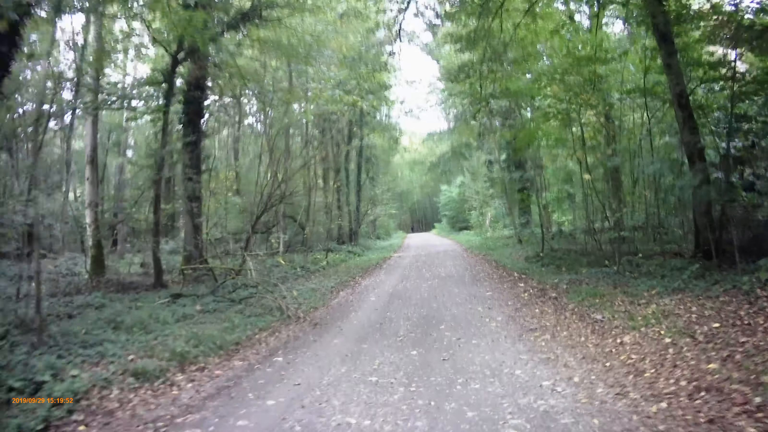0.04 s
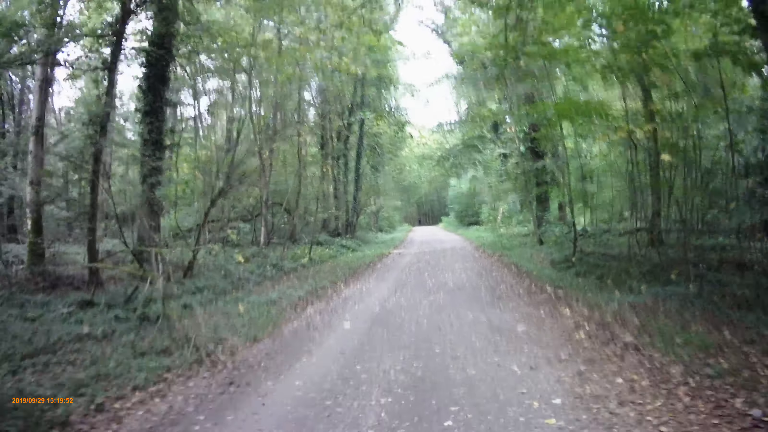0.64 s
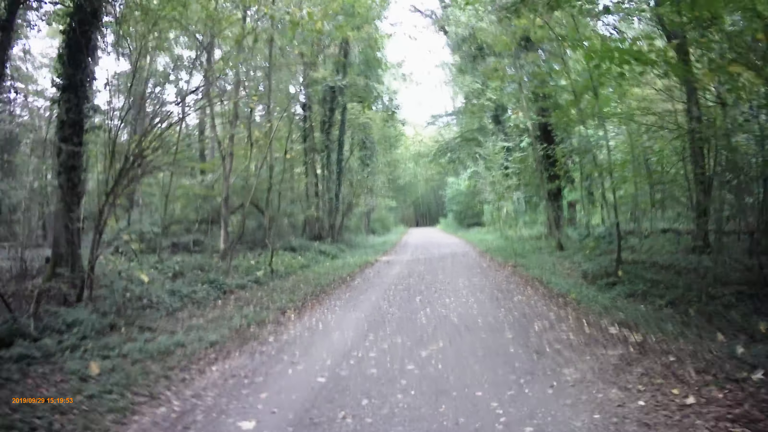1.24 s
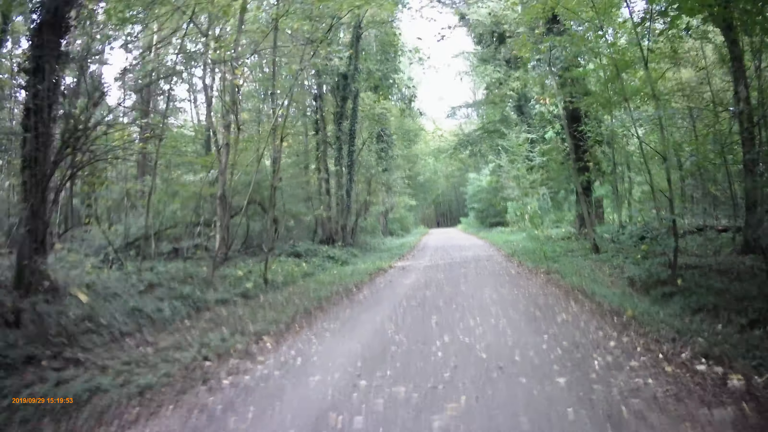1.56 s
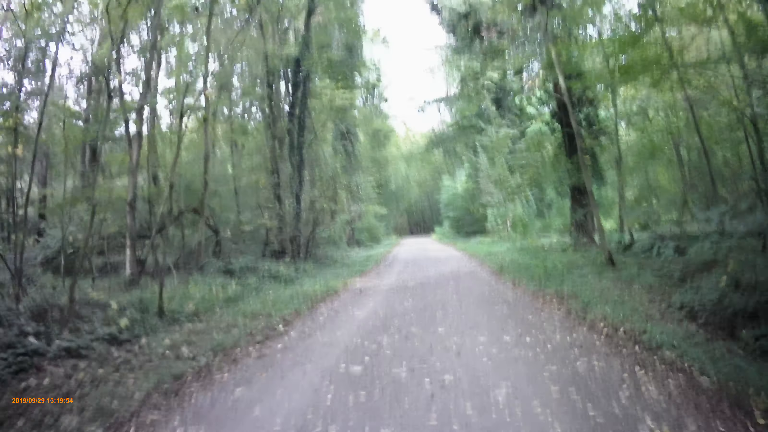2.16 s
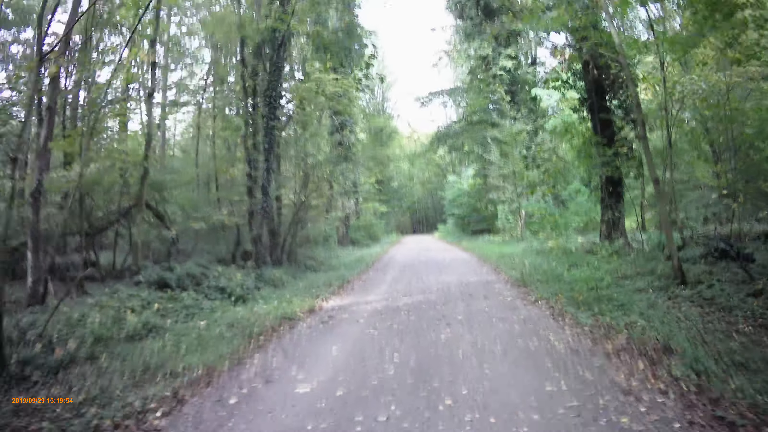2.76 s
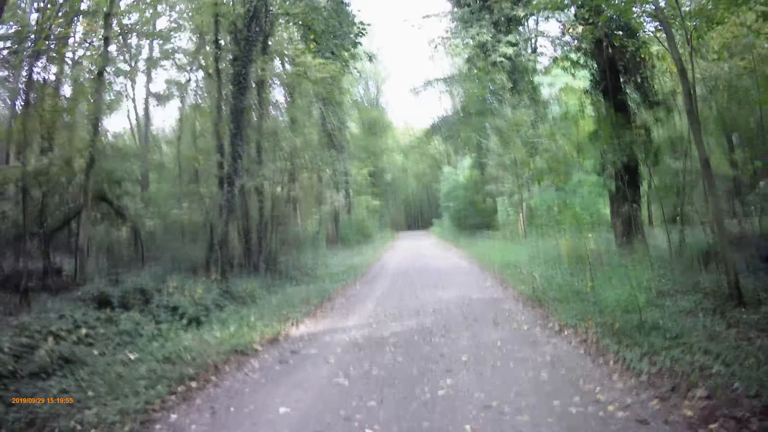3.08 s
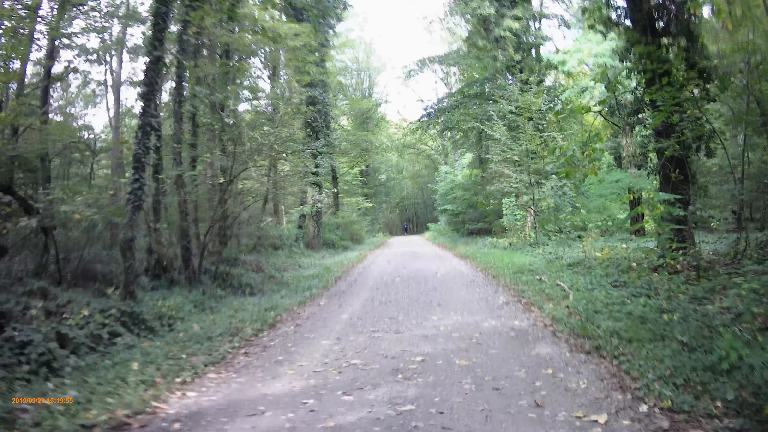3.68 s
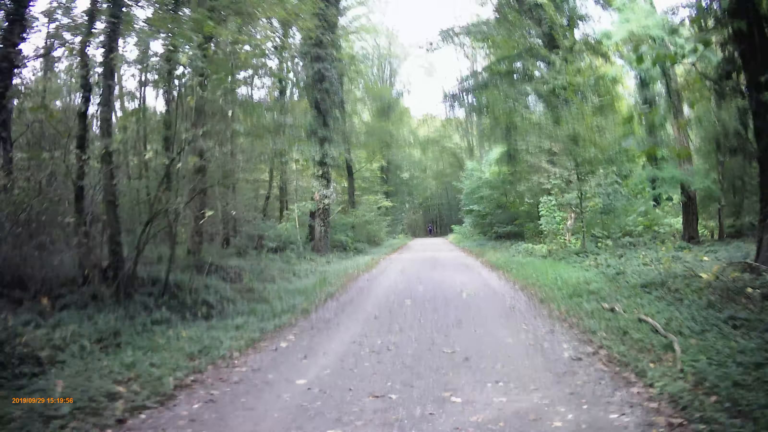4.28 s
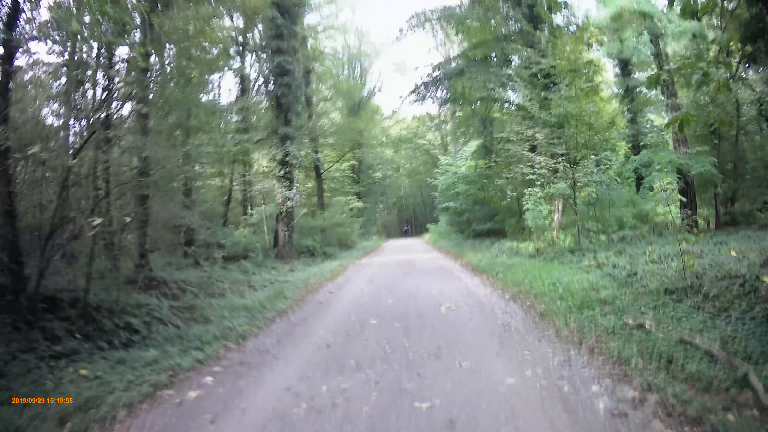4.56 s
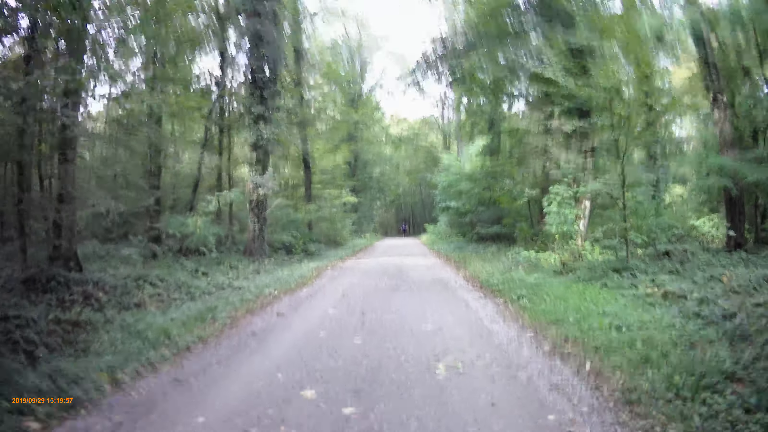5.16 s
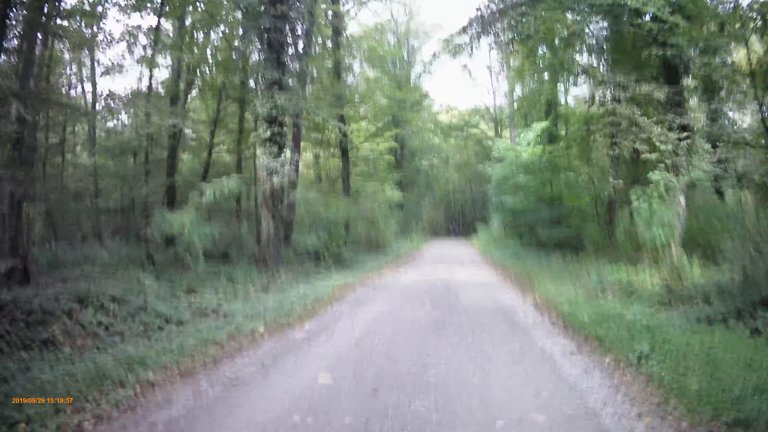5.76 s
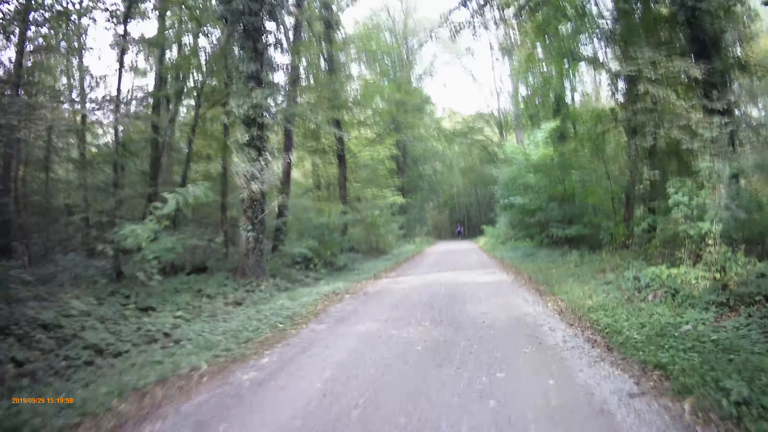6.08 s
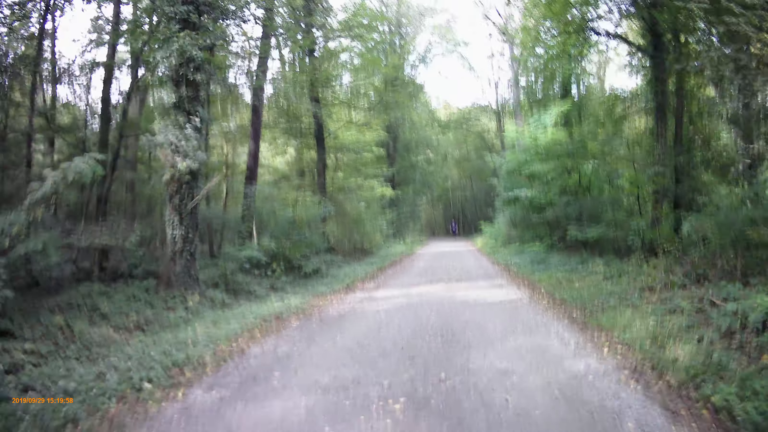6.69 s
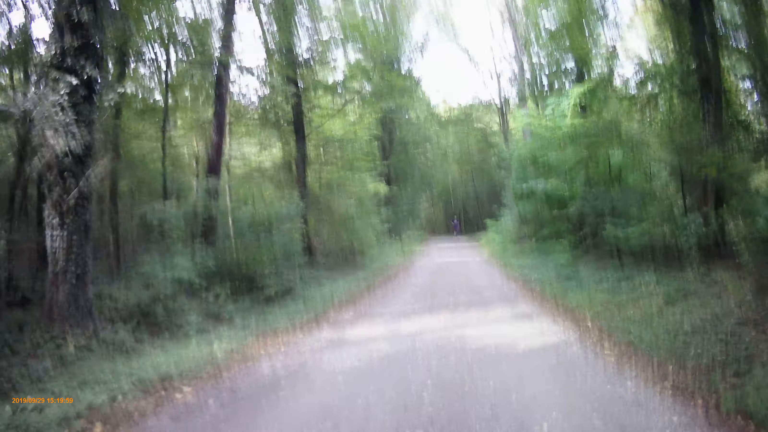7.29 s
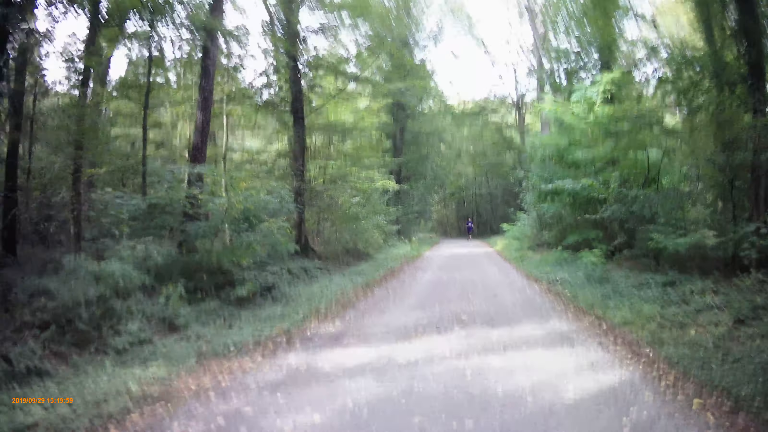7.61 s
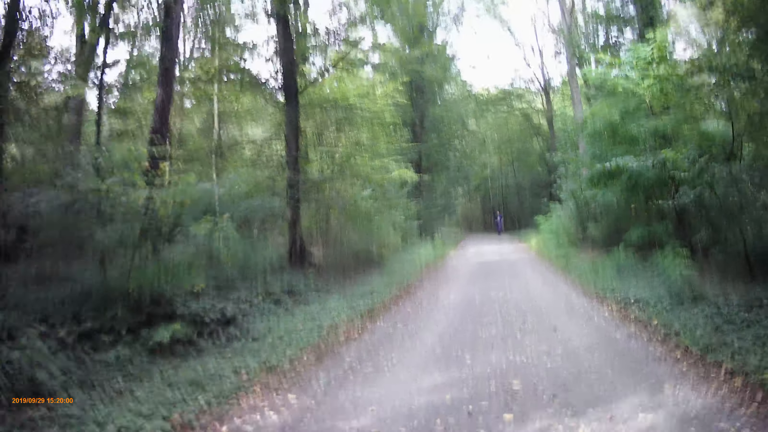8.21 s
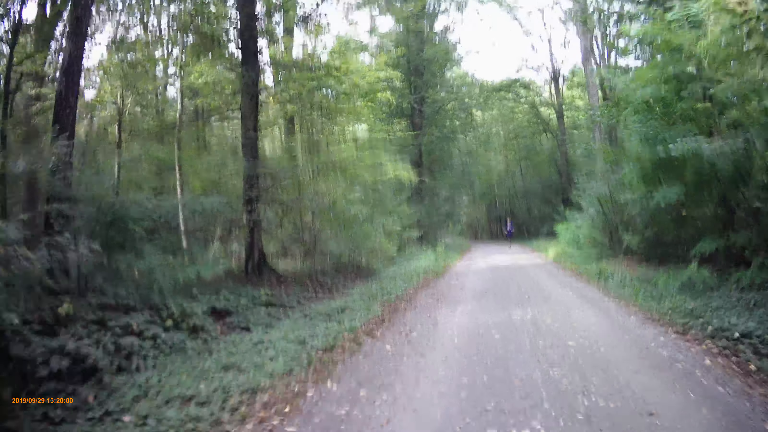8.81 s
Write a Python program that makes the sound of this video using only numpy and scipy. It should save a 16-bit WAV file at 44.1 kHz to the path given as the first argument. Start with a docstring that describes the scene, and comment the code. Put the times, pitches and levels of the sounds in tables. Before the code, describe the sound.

A bicycle rolls along a fine gravel path in woodland, heard close up from the handlebar with no echo. For all nine seconds the tyres rumble and crunch over grit, with a low hum from the swaying bar and a thin chatter of small loose parts. From about 0.9 seconds, bumps make a loose mount click and clatter at uneven intervals, and the hum and chatter swell with each strike. At 1.6 seconds a stone shoots out from under a tyre with a sharp, dry pop, the loudest sound. Fainter stone ticks and short hollow pebble knocks are scattered throughout. A cluster of rattles comes around 2 seconds, then hard knocks near 4.1 and 6.7 seconds. The rattling is busiest from about 7.3 to 7.8 seconds, and one more hard knock lands at 8.8 seconds as the tyres roll on.

```python
"""A bicycle rolls along a fine gravel path in woodland, heard from a camera on its handlebar.
From the start the tyres rumble and crunch over grit, while the swaying bar hums and small parts chatter.
Soon stones pop out from under the tyres and pebbles knock on the bicycle. From about 0.9 s, bumps throw
the loose camera mount against its stop, and the hum and chatter swell with each strike. The loudest
stone pops at 1.6 s; hard strikes come near 4.1, 6.7, 7.3 and 8.8 s, the first and last ringing on."""
import sys
import numpy as np
from scipy import signal
from scipy.fft import rfft, irfft, next_fast_len
from scipy.io import wavfile
from scipy.ndimage import uniform_filter1d, map_coordinates

SR = 44100
rng = np.random.default_rng(int(sys.argv[2]) if len(sys.argv) > 2 else 0)


def pcm_store(signal):
    """Save signal as 16-bit PCM."""
    levels = np.round(np.clip(np.atleast_2d(signal), -1, 1) * 32767)
    wavfile.write(sys.argv[1], SR, levels.astype(np.int16).T)


N = 399096

# tone of crunching gravel: frequency_hz, level_db
GRAVEL_TONE = [(150, -40.5), (500, -6.5), (1000, 2), (1400, -1), (1900, -3.2), (2400, -6.6), (2800, -13.5),
               (3300, -17.5), (4300, -24), (5000, -25), (5400, -30), (7200, -37.5), (11500, -41),
               (13000, -71)]
# tone of the mount's clicking catch: frequency_hz, level_db
CATCH_TONE = [(800, -27), (2400, -2.5), (3400, -13), (3870, -3), (4200, -7), (4620, 2), (4930, 1.5),
              (5220, -18), (6050, -16), (7200, -26.5), (8100, -21), (9300, -29), (10600, -21.5),
              (12500, -54)]
# notes the camera housing rings with: pitch_hz, level_db, fade_s (a fade is the time to drop 60 dB)
HOUSING_NOTES = [(167, -15.5, 0.068), (427, -6.5, 0.014), (675, -5, 0.03), (845, -9.5, .028),
                 (1026, -7.5, 0.036), (1230, -5, 0.016), (1608, -0.5, 0.01), (1920, -4, 0.0098),
                 (2400, -4.5, 0.0062), (3270, -14, 0.0071), (3888, -9, 0.0065)]
HARD_STRIKE_DB = -32.5  # beyond this force the bar sways hardly any wider


def amp(db):
    """Turn decibels into a number to multiply by."""
    return 10 ** (np.asarray(db) / 20)


def unit(x):
    """Scale a sound to an average strength (rms) of 1."""
    return x / np.sqrt(np.mean(x ** 2) + 1e-20)


def burst(x, size):
    """Scale a blow so that its loudest stretch of size samples has rms 1."""
    return x / np.sqrt(uniform_filter1d(x ** 2, size, mode="constant").max())


def limited(db, top_db):
    """Let a level grow until it nears top_db."""
    return db - 10 * np.log10(1 + amp(db - top_db) ** 2)


def gain(tone, hz):
    """How strong a tone table of (frequency_hz, level_db) is at hz."""
    frequency_hz, level_db = np.transpose(tone)
    return amp(np.interp(np.log(hz + 1), np.log(frequency_hz + 1), level_db))


def wobble(rate):
    """A smooth curve through rate random values a second."""
    values = rng.standard_normal(int(N * rate / SR) + 4)
    return map_coordinates(values, [np.arange(N) * rate / SR])


def filtered(x, response):
    """Multiply each frequency in x by response(hz)."""
    size = next_fast_len(N + SR // 2)
    return irfft(rfft(x, size) * response(np.fft.rfftfreq(size, 1 / SR)), size)[:N]


def ring(tone, size=2048):
    """The sound of one sharp tap on a body with this tone table."""
    cepstrum = irfft(np.log(gain(tone, np.fft.rfftfreq(size, 1 / SR))))
    cepstrum[1:size // 2] *= 2  # these two lines put all the ringing after the tap
    cepstrum[size // 2 + 1:] = 0
    return irfft(np.exp(rfft(cepstrum)))


def struck(notes, attack_s, pitch=1, size=4096):
    """A struck body rings with fading notes; neighbours start in opposite directions."""
    t = np.arange(size) / SR
    ringing = sum((-1) ** k * amp(db - 60 * t / fade_s) * np.sin(2 * np.pi * hz * pitch * t)
                  for k, (hz, db, fade_s) in enumerate(notes))
    return (1 - np.exp(-t / attack_s)) * ringing


def add(track, start_s, sound):
    """Mix a sound into the track at start_s."""
    part = track[max(round(start_s * SR), 0):][:len(sound)]
    part += sound[:len(part)]


def uneven(count, spread_db, upper=2):
    """Random strengths for count impacts, scattered around 1."""
    return amp(spread_db * np.clip(rng.standard_normal(count), -2, upper))


def grains(rate, spread_db):
    """Tiny random impacts, about rate of them a second."""
    sizes = uneven(N, spread_db) * rng.choice([-1, 1], N)
    return unit(sizes * (rng.random(N) < rate / SR))


def strikes(repeat_s=.042):
    """A bump makes the mount strike, at times again on every second swing: (start_s, click_db, force_db)."""
    # bumps in the path: start_s, force_db, extra_click_db, then force_db of any repeats
    bumps = [(.867, -40, -4.5, -34.5), (.956, -43, -5), (1.072, -35.5, 0, -33), (1.1735, -42, 0),
             (1.407, -36, -3, -42), (1.861, -39.5, -12, -36), (1.986, -28.5, -2.5), (2.008, -33, -19),
             (2.027, -49, 8), (2.046, -25.5, -16), (2.18, -36, -10, -32.5), (2.482, -33, -.5, -31.5),
             (2.573, -34, -20), (2.661, -34, -17), (2.684, -35, 1.5, -37.5, -39), (3.161, -31, -1.5, -36),
             (3.378, -35.5, -.5), (3.502, -47, 4), (3.788, -38.5, -2.5), (4.008, -32, -1.5),
             (4.04, -40, -5), (4.0545, -16.3, -3), (4.116, -37, -12), (4.141, -34.5, -1.5, -37),
             (4.165, -31.5, 1, -46), (4.219, -34.5, -3), (4.404, -36.5, -9), (4.553, -38.5, 1, -39),
             (4.68, -32.5, -1), (4.703, -31.5, .5, -35), (4.765, -36, 1, -43), (4.856, -46, 1),
             (4.908, -37.5, -.5), (4.964, -39, -7), (5.119, -50, 3), (5.275, -37, .5), (5.481, -36, -1.5),
             (5.563, -30.5, 0, -30.5), (5.882, -40, -4.5), (6.052, -33, -.5), (6.222, -39.5, -2.5),
             (6.349, -32.5, 0, -40.5), (6.409, -33, .5), (6.5526, -46, 3.5), (6.6207, -28, -2, -15),
             (6.651, -36, -9), (6.702, -46, -1), (6.77, -38, -9), (6.79, -38, -11), (6.843, -37, -10),
             (6.865, -40, -2.5, -44), (7.057, -26.5, 1), (7.159, -36, -2), (7.304, -26.5, 1.5),
             (7.327, -19, 0.5, -19.5), (7.346, -30, -9), (7.3875, -21, 1.5, -33), (7.411, -39, -3),
             (7.477, -39, -5), (7.574, -37, -10), (7.598, -26.5, 3), (7.619, -37, 1), (7.689, -36.5, -7),
             (7.731, -28.5, -2), (7.752, -27.5, 0, -31), (7.839, -32, -1), (8.151, -32, -6),
             (8.175, -32, 1.5), (8.239, -44.5, 0, -35), (8.259, -28, 2), (8.303, -33, -1.5, -32),
             (8.469, -35, -15), (8.49, -38.5, -7), (8.717, -37, -7), (8.751, -37, -14), (8.7785, -22, -8.5),
             (8.798, -37, -9)]
    return [(start_s + k * repeat_s, limited(force_db - .5, top_db=-30) + extra_click_db, force_db)
            for start_s, first_db, extra_click_db, *repeats in bumps
            for k, force_db in enumerate([first_db, *repeats])]


def sway(rise_s=.022, fall_s=.042, calm_db=-10.5):
    """How widely the bar sways, in dB around its average: it builds up to each strike, then dies away."""
    t = np.arange(-SR // 2, SR // 2) / SR
    swell = np.exp(np.minimum(t / rise_s, -t / fall_s))
    power = np.full(N, amp(calm_db) ** 2)
    for start_s, _, force_db in strikes():
        jolt = amp(limited(force_db, HARD_STRIKE_DB) - HARD_STRIKE_DB)
        add(power, start_s + t[0], (jolt * swell) ** 2)
    level_db = 10 * np.log10(power)
    return level_db - level_db.mean()


def tyre_rumble(crunch_db, base_db=-39, follow=.29):
    """The rough path shakes the tyres and frame, a little more where the gravel crunches louder."""
    # tone of the rumble: frequency_hz, level_db
    rumble_tone = [(20, -64), (55, -3.5), (110, -1.7), (155, 0.8), (220, 0.5), (400, -1), (600, -3),
                   (740, -14.5), (1000, -8.5), (1600, -15.5), (3000, -57), (8000, -89)]
    # where the frame and tyres ring: pitch_hz, width_hz, boost_db
    frame_notes = [(167, 19, 7.5), (189.6, 21, 4), (246.3, 20.4, 5), (308, 26, 3.5), (509, 41, 3),
                   (620, 120, 4), (804, 128, 10.5)]
    frame = lambda hz: amp(sum(db / (1 + (2 * (hz - pitch_hz) / width_hz) ** 2)
                               for pitch_hz, width_hz, db in frame_notes))
    road = filtered(grains(rate=5000, spread_db=3.5), lambda hz: gain(rumble_tone, hz) * frame(hz))
    level_db = base_db + follow * (crunch_db - crunch_db.mean()) + 1.04 * wobble(14)
    return amp(level_db) * unit(road)


def gravel_crunch(level_db, grind_fade_s=.022):
    """Fine grit crunches under the tyres in clumps; coarser bits grind for a few milliseconds each."""
    t = np.arange(SR // 100) / SR
    bits = grains(rate=150, spread_db=6.5)
    grind_power = signal.fftconvolve(bits ** 2, amp(-120 * t / grind_fade_s))[:N]
    coarse = unit(np.sqrt(np.abs(grind_power))) * rng.standard_normal(N)
    grit = grains(rate=14000, spread_db=7.5) + amp(-1) * coarse
    clumps = amp(1.86 * wobble(45))
    crunch = signal.fftconvolve(grit * clumps, ring(GRAVEL_TONE))[:N]
    return amp(level_db) * unit(crunch)


def handlebar_hum(level_db):
    """The bar sways at its lowest natural note, near 48 Hz."""
    # tone of the swaying bar: frequency_hz, level_db
    bar_tone = [(10, -36), (22, -29), (36, -21), (44, -7.5), (49, 0), (55, -13.5), (64, -10), (110, -29),
                (300, -90)]
    hum = filtered(rng.standard_normal(N), lambda hz: gain(bar_tone, hz))
    return amp(level_db) * unit(hum)


def parts_chatter(level_db, tick_hz=160, fade_s=.012, drift_db=2):
    """Small loose parts fizz on the shaking bar: clumps of quick uneven ticks over a thin rub."""
    # tone of the loose parts: frequency_hz, level_db
    parts_tone = [(1500, -31), (3400, -13.5), (4300, 6), (4600, -6), (5000, -7), (5300, -4.5), (6200, -2),
                  (7200, -15.5), (8600, -11.5), (9300, -2.5), (10200, -9), (11500, -12.5), (12500, -38)]
    beat = np.cumsum(tick_hz * amp(2.5 * wobble(70))) / SR  # counts up by one for each tick
    sizes = uneven(int(beat[-1]) + 1, spread_db=7.5)[beat.astype(int)]
    ticks = unit(sizes * amp(-60 * (beat % 1) / tick_hz / fade_s))
    rub = (ticks + .5) * amp(drift_db * wobble(7)) * rng.standard_normal(N)
    return amp(level_db - 3) * unit(signal.fftconvolve(rub, ring(parts_tone))[:N])


def mount_taps(level_db, sway_hz=47.8, touch_share=.35, fade_s=.012):
    """On about a third of the bar's swings the mount touches its stop, ringing the catch and housing."""
    swing = np.cumsum(sway_hz * (1 + .07 * wobble(25))) / SR
    count = int(swing[-1]) + 1
    sizes = uneven(count, spread_db=3.5, upper=1.5) * (rng.random(count) < touch_share)
    fade = amp(-60 * (swing % 1) / sway_hz / fade_s)
    touches = sizes[swing.astype(int)] * fade * rng.standard_normal(N)
    catch = unit(signal.fftconvolve(touches, ring(CATCH_TONE))[:N])
    housing = unit(signal.fftconvolve(touches, struck(HOUSING_NOTES, attack_s=.00026))[:N])
    return amp(level_db - 3.5) * (catch + amp(15) * housing)


def pops_and_ticks(attack_s=.0014, crack_db=-9, crack_fade_s=.02, chips_per_s=3.5):
    """Dry pops with a crack, mostly pinched stones snapping free; faint ones and random chips just tick."""
    # stone pops and small ticks, including one just before the hard knock near 4.05 s:
    # start_s, peak_db, pitch_ratio, dull_above_hz
    pops = [(.283, -30, 1.15, 7000), (.904, -30, 1.3, 4000), (1.1722, -25, 1.1, 8000),
            (1.5703, 0, 0.98, 11900), (2.403, -32, 1.14, 4500), (3.6233, -27, 1.1, 2800),
            (4.0468, -28, 0.91, 2800), (4.293, -31, 1.2, 5500), (4.883, -32, 1.25, 3500),
            (4.893, -29, 1.55, 5000), (5.6408, -21, 1.03, 2870), (5.989, -28, 1.27, 3600),
            (6.008, -28.5, 1.25, 3600), (6.156, -25, 1.02, 2380), (6.848, -24.5, 0.85, 2300),
            (7.557, -28, 1.05, 4000), (7.649, -28, 1, 2800), (7.656, -23, 0.85, 3000),
            (7.863, -31, 1.2, 4500), (8.13, -28, 1, 5000)]
    # notes of the pop: pitch_hz, level_db, fade_s
    pop_notes = [(878, -22, .035), (1087, -15, .034), (1339, 5, .018), (1670, -1, .028), (1970, 5.2, .018),
                 (2212, -2.5, .021), (2609, -9.5, .021), (2960, -3.6, .018), (3247, -13, .022),
                 (3710, -22, .02), (4780, -28, .023), (5469, -17, .017), (6851, -24, .012),
                 (8239, -31, .013), (10978, -28, .012)]
    # tone of the crack: frequency_hz, level_db
    crack_tone = [(300, -32), (800, -19), (1300, -2), (2400, 0), (3200, -5), (4200, -22), (7000, -26),
                  (12000, -29)]
    out = np.zeros(N)
    chips = [(when * N / SR, -37 + 3 * loud, 1.15 + .4 * high, 5500)
             for when, loud, high in rng.random((round(chips_per_s * N / SR), 3))]
    for start_s, peak_db, pitch, dull_above_hz in pops + chips:
        dull = lambda hz: -10 * np.log10(1 + (hz / dull_above_hz) ** 10)
        pop = struck([(hz, db + dull(hz * pitch), fade_s) for hz, db, fade_s in pop_notes],
                     attack_s, pitch)
        t = np.arange(len(pop)) / SR
        snap = rng.standard_normal(len(t)) * amp(-60 * t / crack_fade_s) * (1 - np.exp(-t / attack_s))
        crack = signal.fftconvolve(snap, ring([(hz, db + dull(hz)) for hz, db in crack_tone]))[:len(t)]
        sound = unit(pop) + amp(crack_db) * unit(crack)
        add(out, start_s, amp(peak_db) * sound / np.abs(sound).max())
    return out


def hollow_tocks(fade_s=.041, attack_s=.00082, scuff_db=-12, faint_count=8):
    """A flicked pebble or a hard strike leaves a short tock and a dull scuff; faint ones come at random."""
    # hollow tocks near 900 Hz, from flicked pebbles and the ring after two hard mount strikes:
    # start_s, relative_level_db, pitch_hz
    tocks = [(.620, -36, 834), (.882, -34, 870), (1.122, -31, 900), (2.198, -34, 850), (2.574, -26.5, 1050),
             (3.068, -32, 870), (3.221, -31.5, 930), (3.287, -31, 885), (4.066, -29, 985),
             (4.458, -29.5, 820), (4.517, -36, 960), (4.923, -31, 850), (5.243, -33, 950),
             (5.401, -28.5, 820), (5.684, -31, 980), (5.745, -33, 870), (5.909, -32, 880),
             (6.070, -28, 895), (6.462, -30.5, 880), (8.090, -31.5, 920), (8.245, -31, 890),
             (8.790, -31, 896), (8.969, -36, 1080)]
    out, t = np.zeros(N), np.arange(SR // 12) / SR
    grit = ring(GRAVEL_TONE)
    shape = amp(1.5 - 60 * t / fade_s) * (1 - np.exp(-t / attack_s))
    faint = [(rng.uniform(0, N / SR), -36, 900 * rng.uniform(.79, 1.14)) for _ in range(faint_count)]
    for start_s, db, pitch_hz in tocks + faint:
        phase = 2 * np.pi * pitch_hz * t
        tock = np.sin(phase) + .25 * np.sin(phase * rng.uniform(.89, 1.7))
        scuff = amp(scuff_db) * unit(signal.fftconvolve(rng.standard_normal(len(t)), grit)[:len(t)])
        add(out, start_s, amp(db) * shape * (tock + scuff))
    return out


def mount_rattle(slip_s=.003, thud_hz=560, scrape_s=.0008, scrape_db=-17.5, tail_db=-15):
    """The mount slips with a thud and clatters on its stop; the catch scrapes shut, the housing knocks."""
    # tone of the mount's parts hitting each other: frequency_hz, level_db
    clatter_tone = [(250, -26), (650, -7), (1150, 0), (1400, -1), (1900, -4), (2400, -9.5), (3000, -22),
                    (7000, -48)]
    lead = SR // 100  # samples of sound before the blow
    out, t = np.zeros(N), np.arange(-lead, SR // 20) / SR
    catch, parts = ring(CATCH_TONE), ring(clatter_tone)

    def swell(at_s, rise_s, fade_s, hold_s=0):
        """Rise, stay full for hold_s on either side of at_s, then fade."""
        away = np.maximum((at_s - hold_s - t) / rise_s, (t - at_s - hold_s) / fade_s)
        return amp(-60 * np.maximum(away, 0))

    tail = amp(tail_db) * swell(0, rise_s=.013, fade_s=.07)
    clatter_shape = np.maximum(swell(scrape_s, rise_s=.0065, fade_s=.013, hold_s=.0026), tail)
    shutting = swell(scrape_s, rise_s=.005, fade_s=.01, hold_s=scrape_s)
    for start_s, click_db, force_db in strikes():
        scrape_noise, clatter_noise = rng.standard_normal((2, len(t)))
        slip_at_s = -slip_s * rng.uniform(.77, 1.124)
        thud_note = np.sin(2 * np.pi * thud_hz * rng.uniform(.89, 1.037) * (t - slip_at_s))
        thud = swell(slip_at_s / 2, rise_s=.0097, fade_s=.023) * thud_note
        scrape = (shutting + .25 * swell(slip_at_s, rise_s=.005, fade_s=.01)) * scrape_noise
        click = signal.fftconvolve((t == 0) + amp(scrape_db) * scrape, catch)  # one tick plus the scrape
        clatter = signal.fftconvolve(clatter_shape * clatter_noise, parts)
        knock = struck([(hz, db + rng.normal(0, 1.1), fade_s) for hz, db, fade_s in HOUSING_NOTES],
                       attack_s=.00017)
        knock_db = force_db - 2 + .1 * (force_db - HARD_STRIKE_DB)
        early_s = start_s - lead / SR
        add(out, early_s, amp(limited(force_db, top_db=-32) + .5) * burst(thud, size=176))
        add(out, early_s, amp(click_db + .5) * burst(click, size=66))
        add(out, early_s, amp(limited(force_db, top_db=-23) - 3.5) * burst(clatter, size=176))
        add(out, start_s - slip_s / 2, amp(knock_db) * burst(knock, size=176))
    return out


def scene():
    """The bar's sway drives its hum and all that is loose; everything is close by, with no echo."""
    # how loudly the path crunches along the way: time_s, relative_level_db
    path_levels = [(0.0, -47), (2.11, -43.5), (2.37, -48), (2.72, -43.5), (3.2, -45), (4.76, -44.5),
                   (5.17, -46), (5.52, -46), (7.08, -45.5), (7.54, -42), (7.81, -47), (9.05, -45)]
    # slow drift of the fizzing chatter: time_s, relative_level_db
    fizz_levels = [(0.0, -77), (1.1, -68), (1.7, -72), (2.02, -70.5), (2.7, -67.5), (3.63, -75),
                   (4.2, -66.5), (4.8, -68), (5.6, -66), (6.27, -69), (7.36, -67.5), (9.05, -67.5)]
    t, sway_db = np.arange(N) / SR, sway()
    crunch_db = np.interp(t, *np.transpose(path_levels)) - 2.5 + .41 * sway_db
    chatter_db = np.interp(t, *np.transpose(fizz_levels)) + 1.5 + 1.24 * sway_db
    tyres = tyre_rumble(crunch_db) + gravel_crunch(crunch_db)
    hits = pops_and_ticks() + hollow_tocks()
    bar = handlebar_hum(-52 + sway_db) + parts_chatter(chatter_db)
    mount = mount_taps(chatter_db + .2 * sway_db) + mount_rattle()
    return (tyres + hits + bar + mount)[None]


def record(dry):
    """The camera rounds off the loudest peaks and cuts the highest treble."""
    ceiling, top_hz = .93, 12300
    rounded = dry[0] / (1 + np.abs(dry[0] / ceiling) ** 6) ** (1 / 6)
    return filtered(rounded, lambda hz: 1 / (1 + (hz / top_hz) ** 120))[None]


dry = scene()
out = record(dry)
pcm_store(out)
```